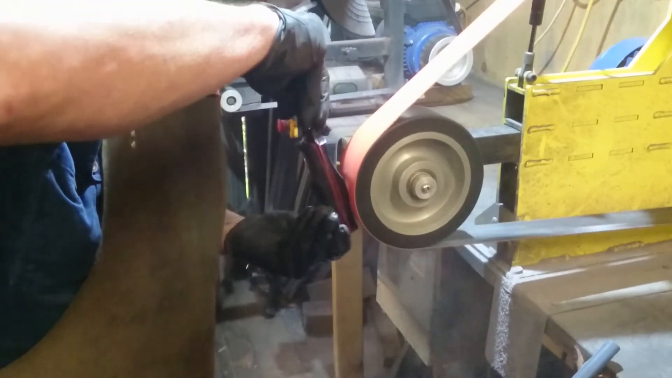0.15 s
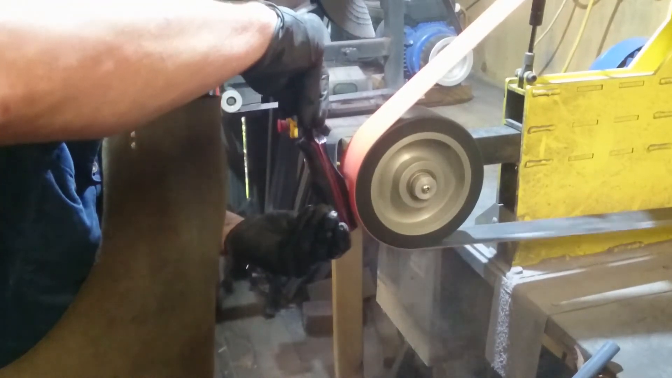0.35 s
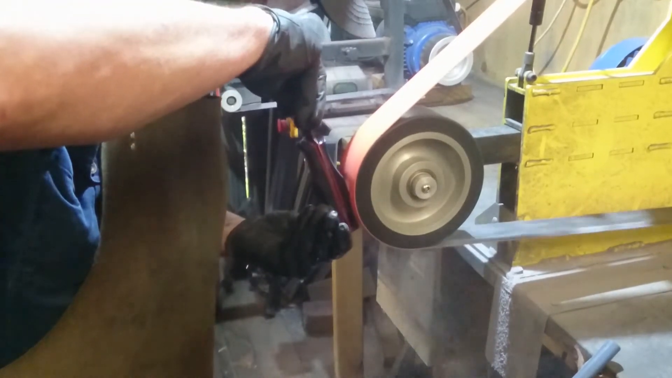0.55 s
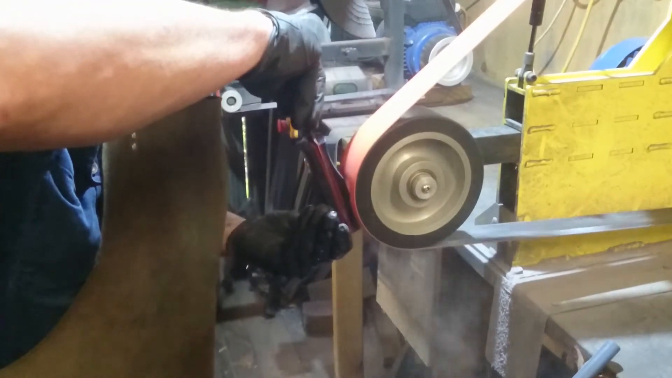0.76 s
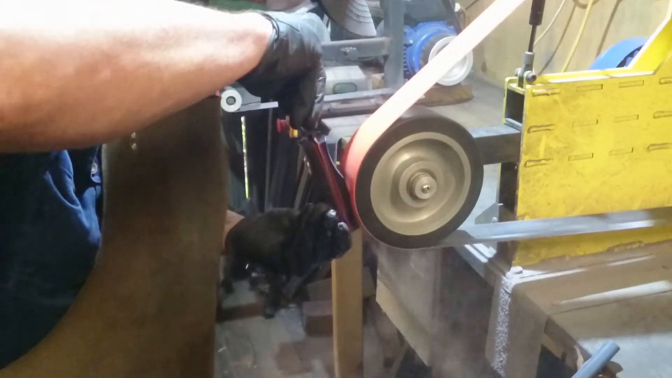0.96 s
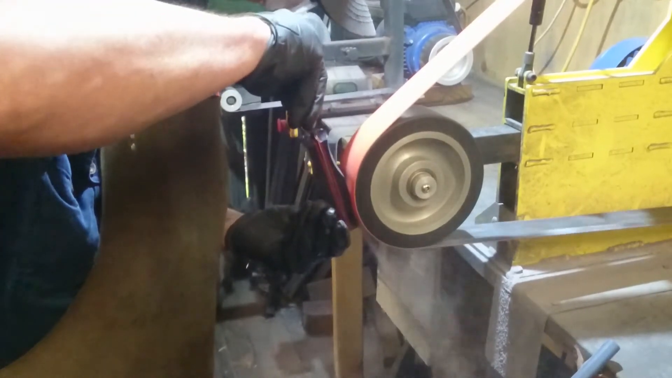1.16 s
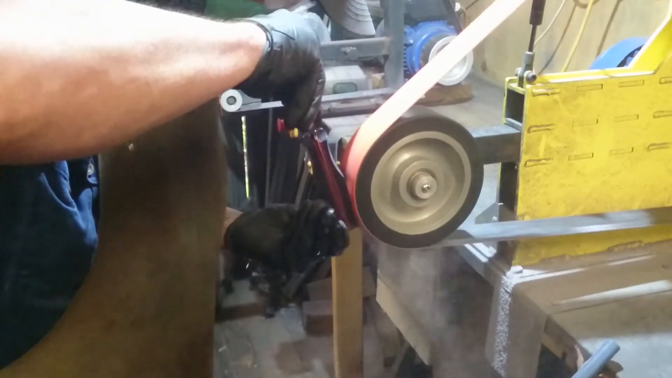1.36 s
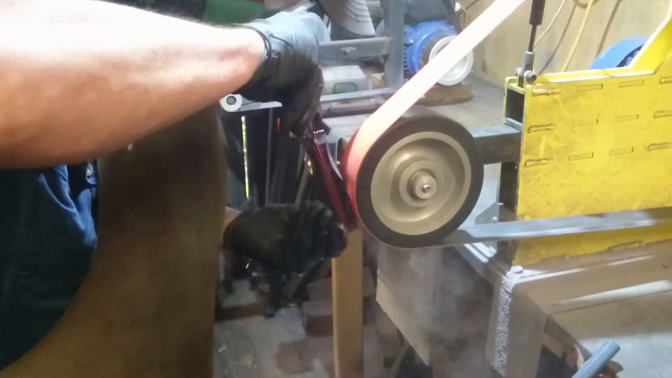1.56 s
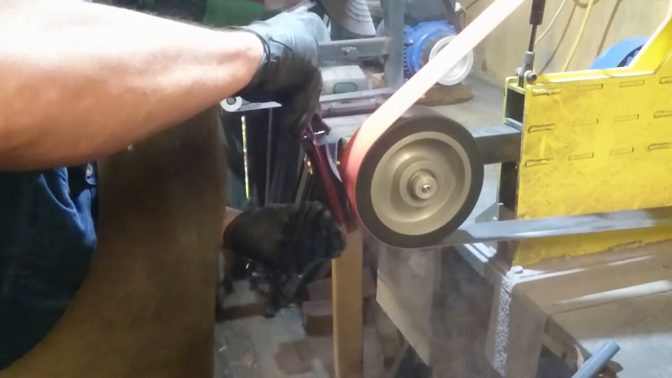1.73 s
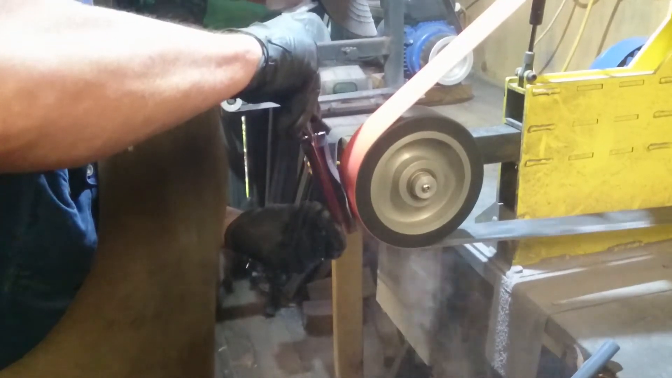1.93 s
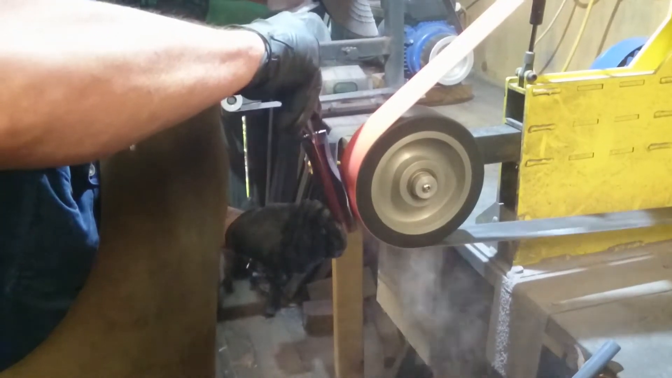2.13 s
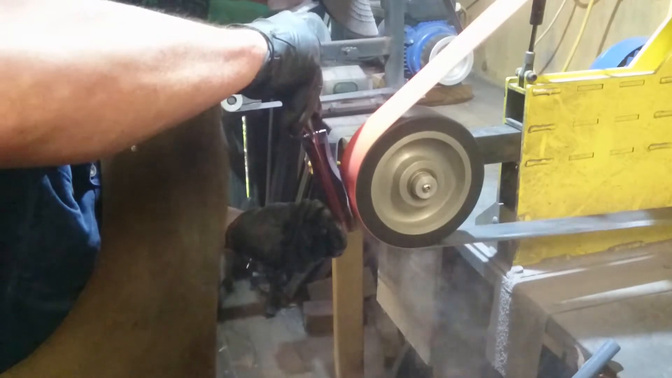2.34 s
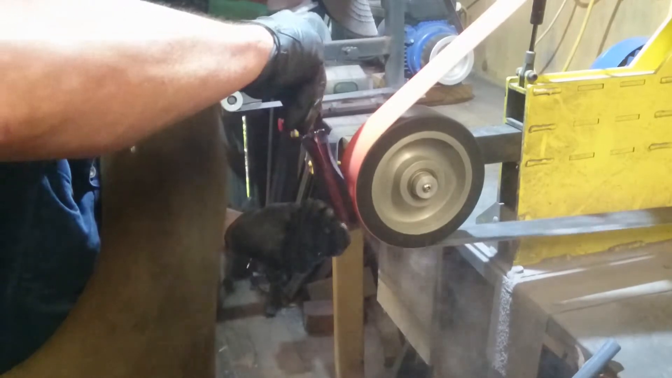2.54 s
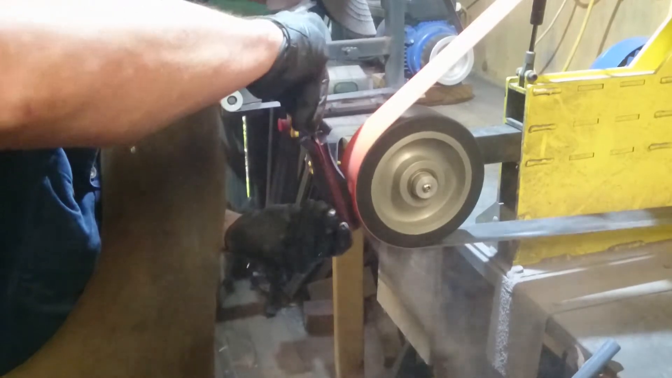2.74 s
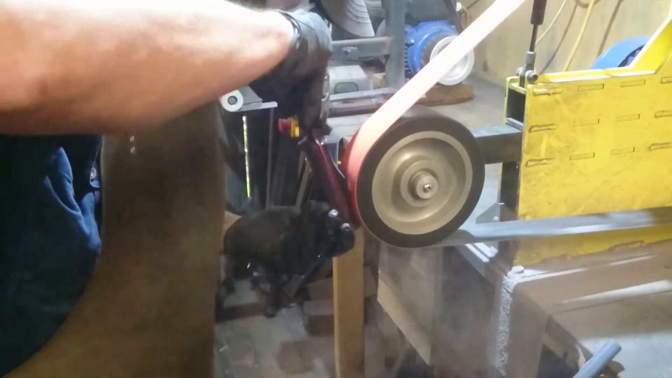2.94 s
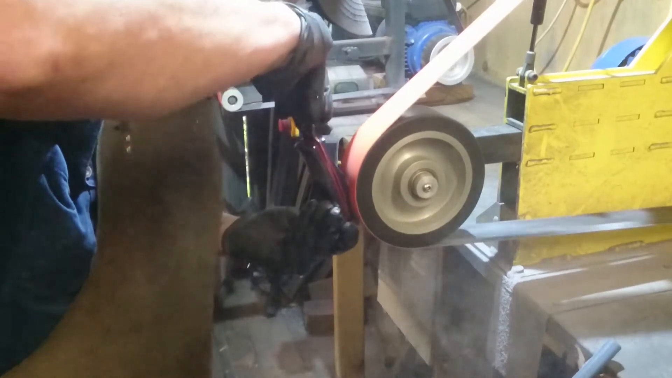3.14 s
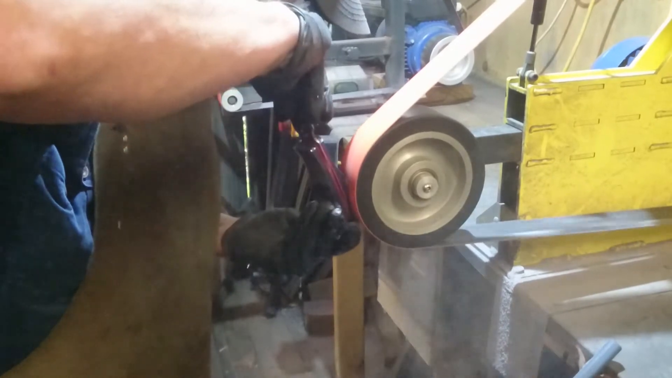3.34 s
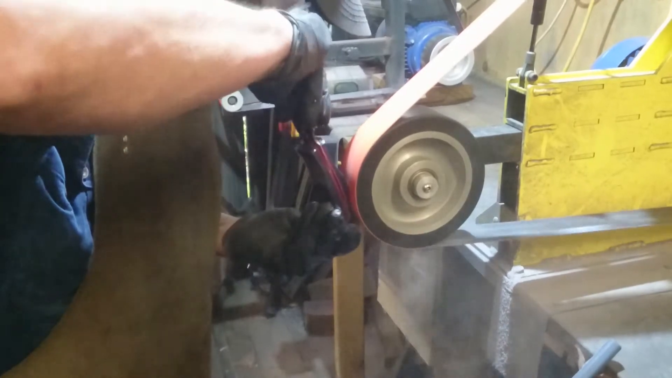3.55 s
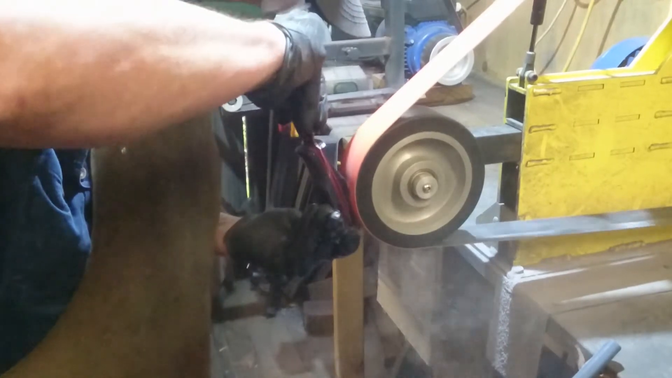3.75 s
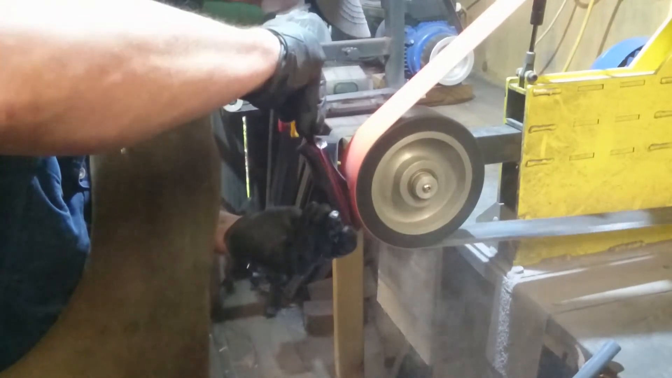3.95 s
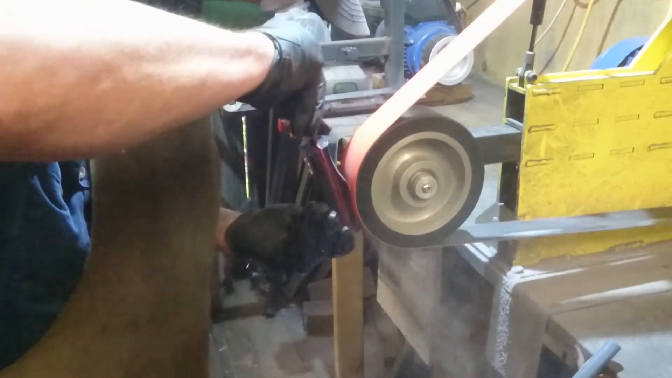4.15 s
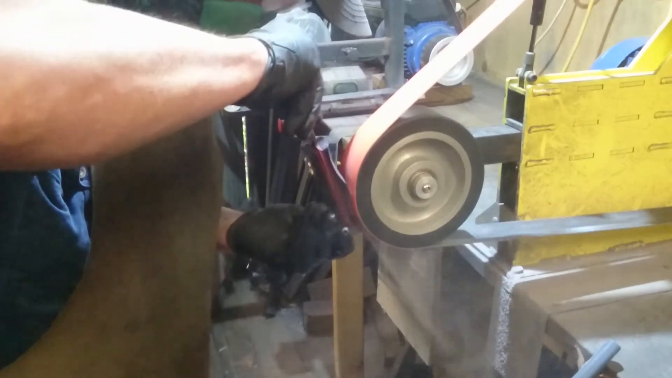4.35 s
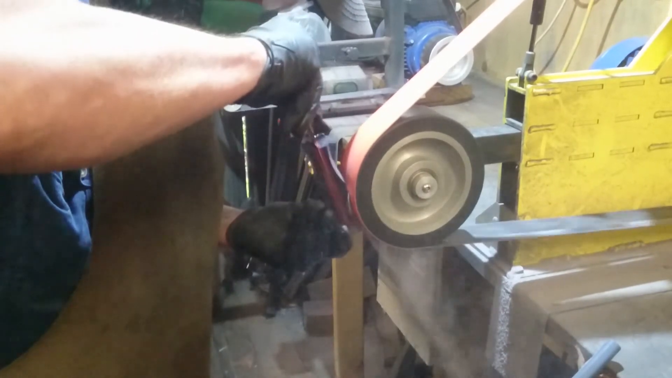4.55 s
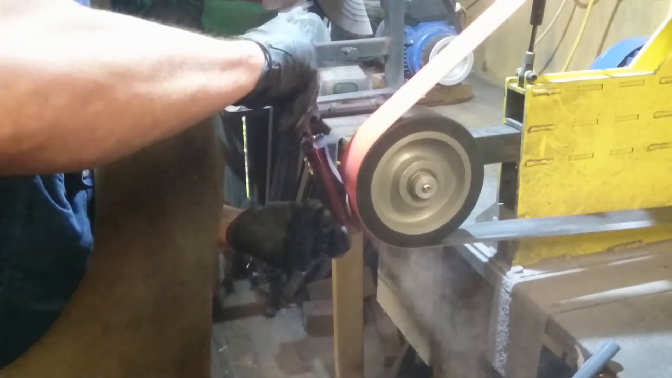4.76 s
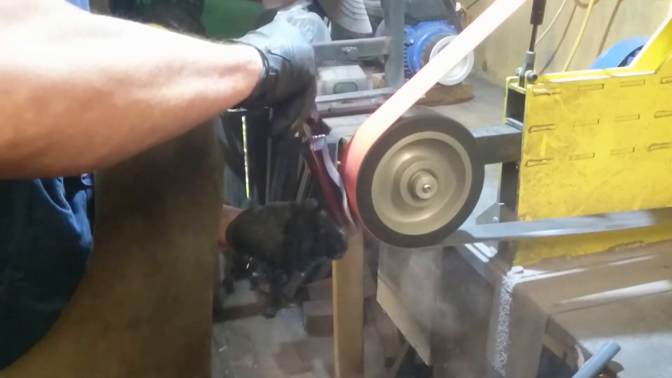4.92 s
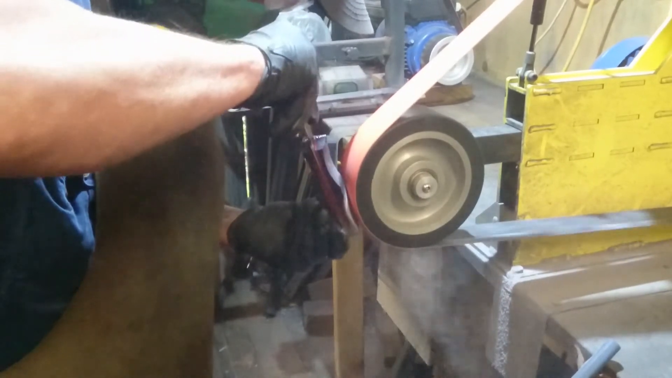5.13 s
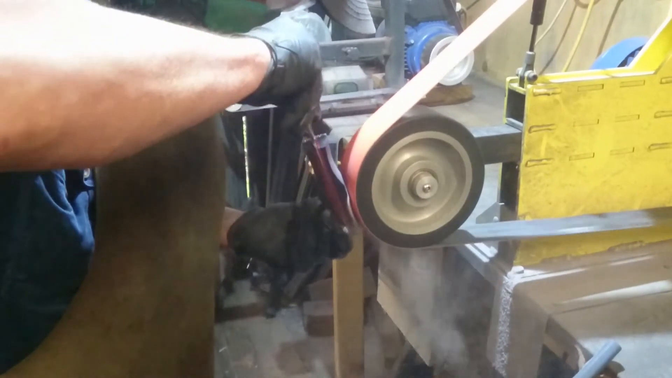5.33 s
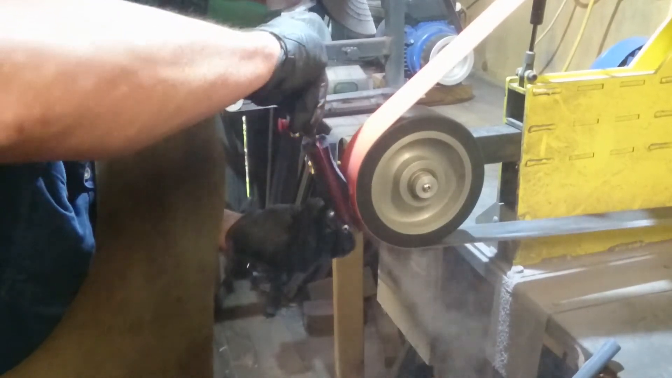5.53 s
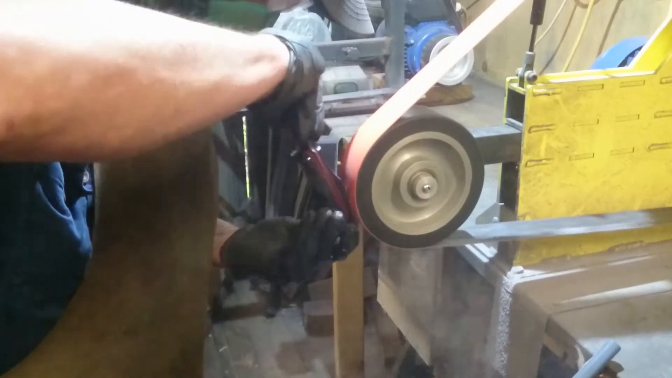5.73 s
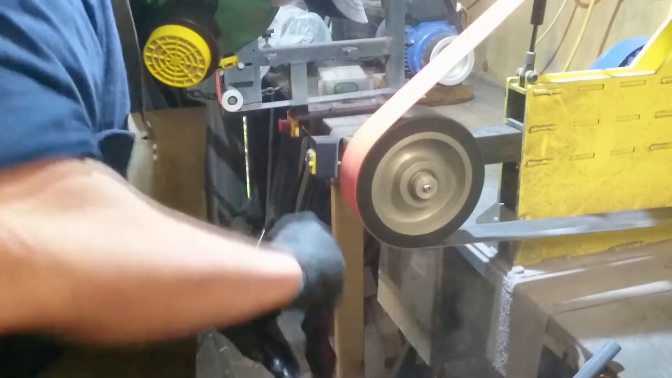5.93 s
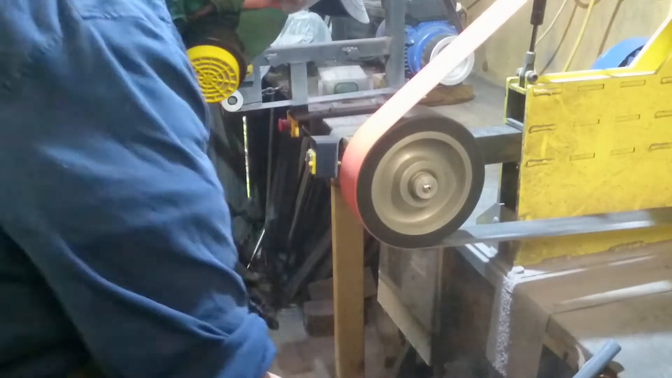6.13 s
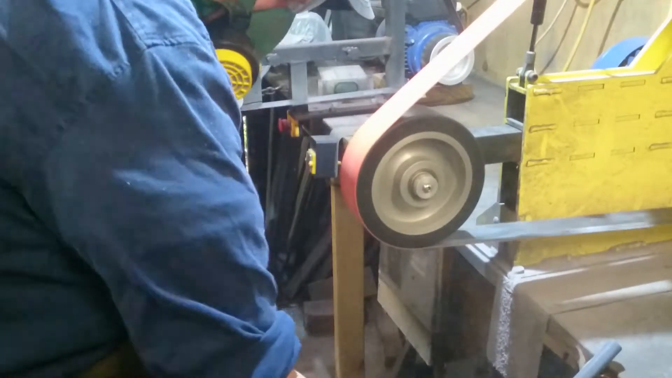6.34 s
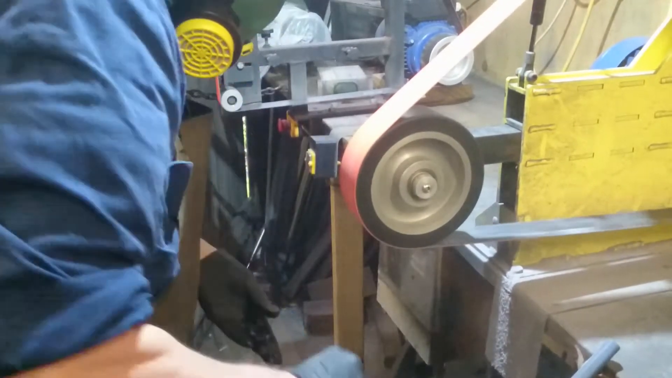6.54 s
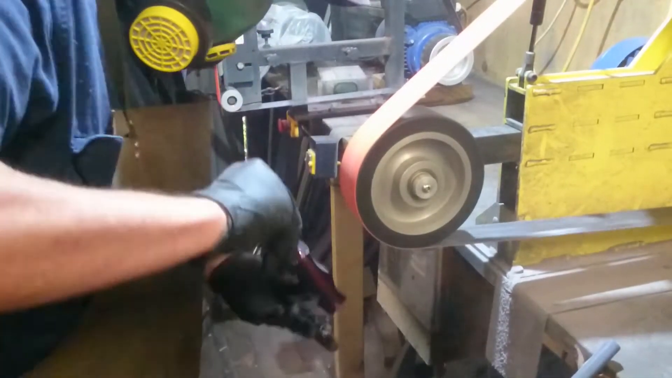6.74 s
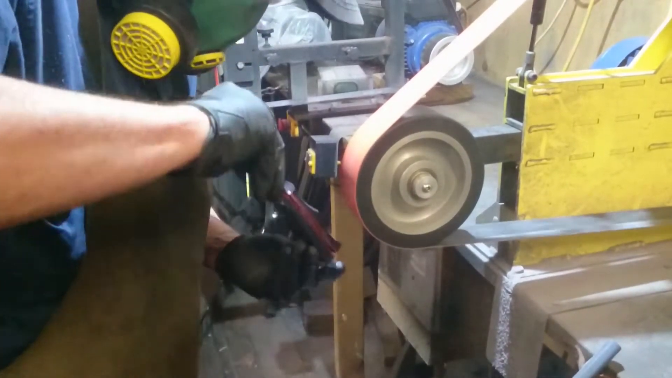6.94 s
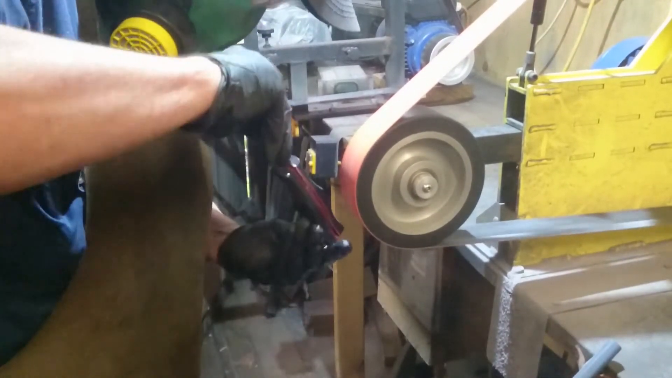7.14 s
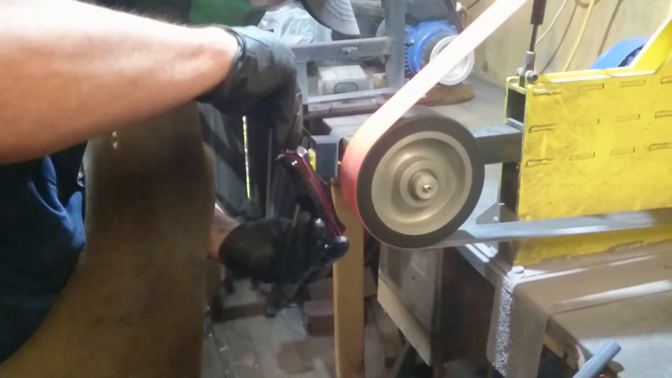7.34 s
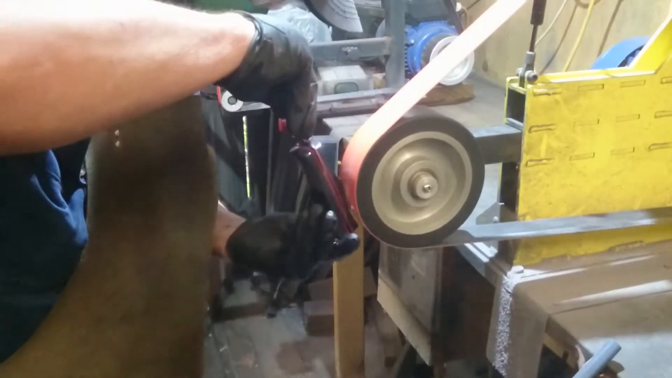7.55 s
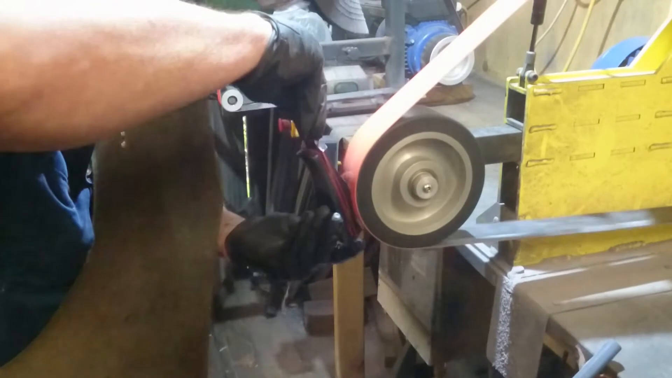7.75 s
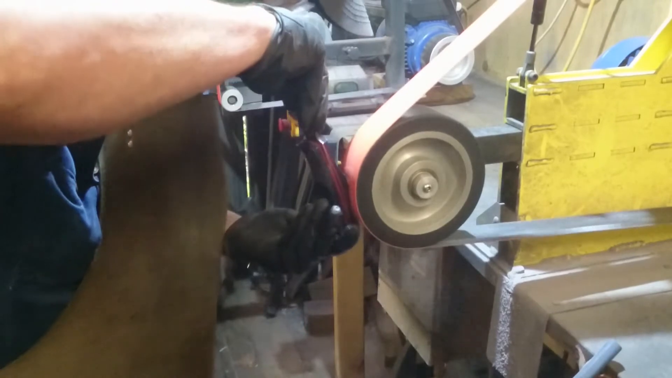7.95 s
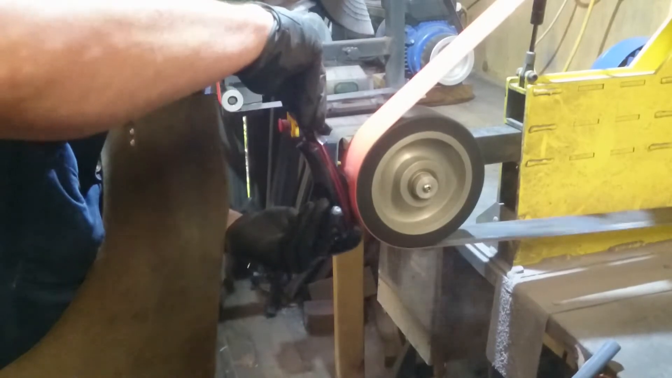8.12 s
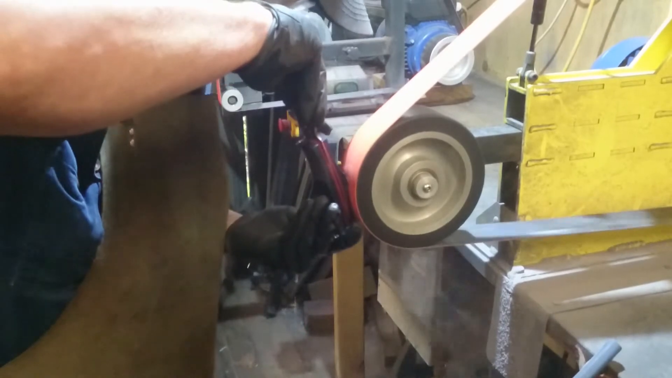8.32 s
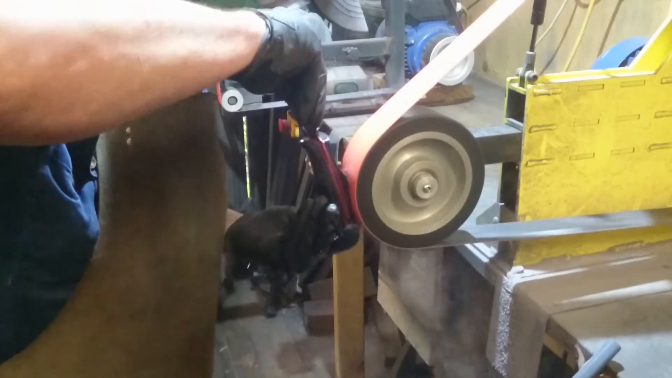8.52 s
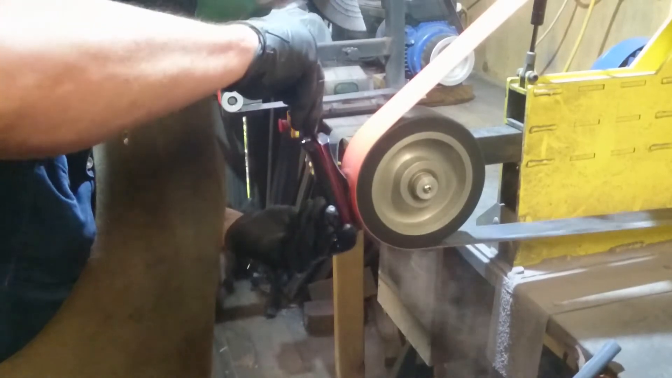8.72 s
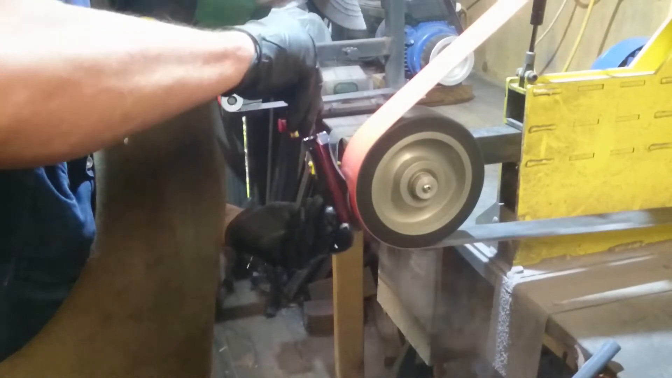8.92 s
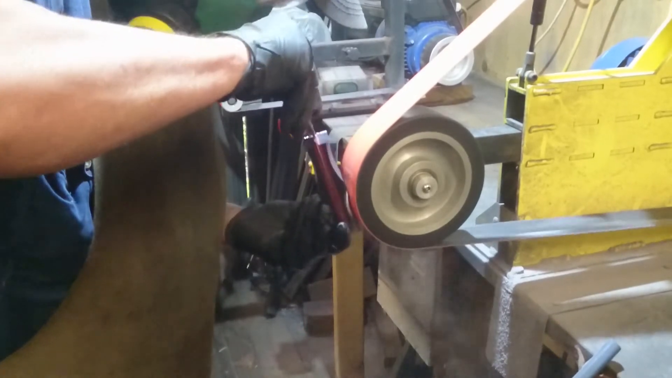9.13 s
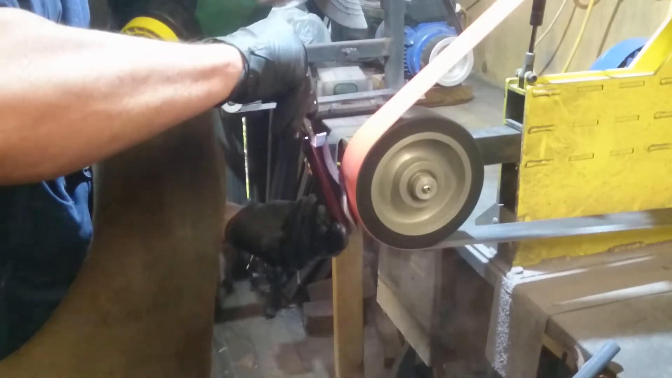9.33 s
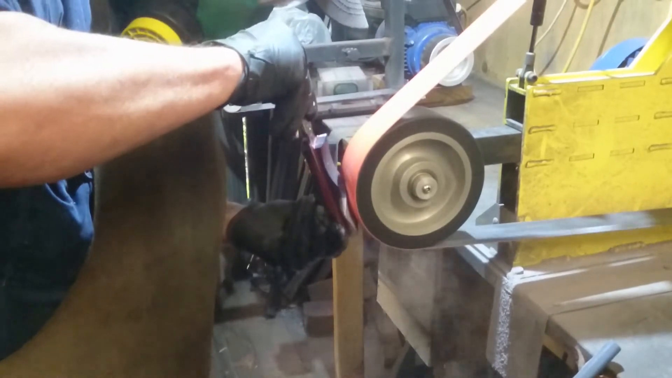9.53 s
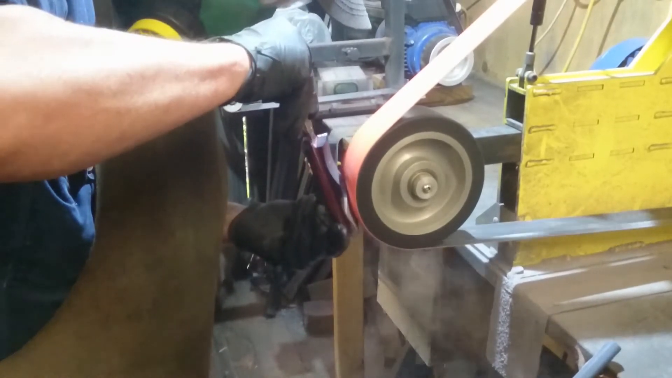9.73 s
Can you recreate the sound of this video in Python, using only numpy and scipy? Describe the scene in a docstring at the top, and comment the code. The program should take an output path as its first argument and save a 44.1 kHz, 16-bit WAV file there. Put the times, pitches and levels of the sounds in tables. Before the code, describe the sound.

A belt grinder whines steadily while a blade hisses harshly on its abrasive belt, lifts off for two seconds, then is pressed on again.

```python
"""A workshop belt grinder whines, hums and swishes throughout, its belt slapping softly as splice and kink come round.
A blade is already grinding on its contact wheel: grit hisses through the blade's resonances and throbs with
every lap, the frame rumbles, and early on the bouncing blade adds low drones. At 5.8 s the blade lifts off for
about two seconds, then is pressed on again, lightly at first. Hiss and swish are shaped noise, the motor is
wavering sines; two microphone ports hear it, nearly in opposite phase in the bass."""
import sys
import numpy as np
from scipy import signal
from scipy.fft import rfft, irfft
from scipy.io import wavfile
from scipy.ndimage import uniform_filter1d

SR = 44100
rng = np.random.default_rng(int(sys.argv[2]) if len(sys.argv) > 2 else 0)


def to_wav(sig):
    """Store sig (one row per channel, or 1-D mono) as 16-bit WAV at the path in sys.argv[1].

    Samples outside -1..1 are clipped; the rate is SR.
    """
    pcm = np.clip(np.atleast_2d(sig), -1, 1) * 32767
    pcm = np.round(pcm).astype(np.int16)
    wavfile.write(sys.argv[1], SR, pcm.T)  # frames by channels


N = 431295
TIME = np.arange(N) / SR


def gain_of(db):
    """Decibels to amplitude."""
    return 10 ** (np.asarray(db) / 20)


def evened(x):
    """Scales to an rms of one."""
    return x / np.sqrt(np.mean(abs(x) ** 2) + 1e-20)


def curve(rows, t):
    """Every column of a time table, read at the times t."""
    seconds, *columns = np.transpose(rows)
    return np.array([np.interp(t, seconds, column) for column in columns])


def read(rows, hz):
    """Every column of a frequency table, read on a log axis: columns x bins x 1."""
    row_hz, *columns = np.transpose(rows)
    at, knots = np.log(hz + 1), np.log(abs(row_hz) + 1)
    return np.array([np.interp(at, knots, column) for column in columns])[:, :, None]


def hump(hz, centre, half_width):
    """Bell-shaped weight of one resonance, down to 1/e at its half width: bins x 1, or x times."""
    return np.exp(-((hz[:, None] - centre) / half_width) ** 2)


def above(hz, edge_hz, order):
    """Share of each frequency that lies above a soft edge: bins x 1."""
    return (hz ** order / (hz ** order + edge_hz ** order))[:, None]


def swell(t, centre, half_length):
    """Bell-shaped rise and fall in time, down to 1/e at its half length."""
    return np.exp(-((t - centre) / half_length) ** 2)


def wander(rate_hz):
    """Smooth random motion of rms one, up to about the given rate."""
    size = 2 ** 19
    hz = np.fft.rfftfreq(size, 1 / SR)
    smooth = np.exp(-(hz / rate_hz) ** 2)
    return evened(irfft(rfft(rng.standard_normal(size)) * smooth)[:N])


def waver(rate_hz):
    """A slowly turning random phasor of rms one, for tones that are not quite steady."""
    knots = np.arange(0, TIME[-1] + 1, 1 / 200)
    smooth = np.exp(-(np.fft.fftfreq(len(knots), knots[1]) / rate_hz) ** 2)
    noise = rng.standard_normal(len(knots)) + 1j * rng.standard_normal(len(knots))
    path = np.fft.ifft(smooth * noise)
    return evened(np.interp(TIME, knots, path))


def port_noise(ports, size):
    """Short-time spectra of white noise (0 dB per Hz) as the two ports share it."""
    white = rng.standard_normal((2, N)) * np.sqrt(SR / 2)
    hz, t, (left, other) = signal.stft(white, SR, nperseg=size)
    coherence, lead = read(ports, hz)
    right = (coherence * left + np.sqrt(1 - coherence ** 2) * other) * np.exp(-1j * lead)
    return hz, t, np.array([left, right])


def to_sound(z):
    """Short-time spectra back to a waveform."""
    return signal.istft(z)[1][:, :N]


def room_ripple(hz, depth_db, count=3):
    """Reflections from bench and walls put fixed fine peaks and dips in each port's spectrum."""
    return depth_db * evened(uniform_filter1d(rng.standard_normal((2, len(hz), 1)), count, axis=1))


def belt_texture(laps, count):
    """Random unevenness fixed along the belt, so that it returns on every lap."""
    return np.interp(laps, np.arange(count) / count, evened(rng.standard_normal(count)), period=1)


# Passes of the blade over the belt. Each row: touches at in seconds, lifts off at in seconds,
# slowing of the belt in laps a second, lift of the sizzle in dB.
PASSES = [(-.2, 5.845, 0.0786, 0.4), (7.72, 10, 0.049, 2)]
# the blade takes this long to seat on the belt and to come away
SEAT_S, LEAVE_S = .07, .06


def passes(t):
    """Contact (0-1), and the belt's slowing and sizzle dB of whichever pass is under way."""
    touch, lift, *settings = np.transpose(PASSES)[:, :, None]
    contact = np.clip(np.minimum((t - touch) / SEAT_S, (lift - t) / LEAVE_S), 0, 1)
    return [(contact * value).sum(0) for value in [1, *settings]]


# speed of the free belt, and how slowly the motor follows a change of load
IDLE_LAPS_PER_S, INERTIA_S = 4.741, .3


def belt_laps():
    """Laps the belt has run: it slows under the blade and recovers when free."""
    _, slowing, _ = passes(TIME)
    keep = np.exp(-1 / (INERTIA_S * SR))
    lagged_slowing = signal.lfilter([1 - keep], [1, -keep], slowing)
    return np.cumsum(IDLE_LAPS_PER_S - lagged_slowing) / SR


# Resonances of the frame, at full share. Each row: centre in Hz, half width in Hz, boost in dB.
FRAME = [(215, 36, 8), (358, 18, 3), (470, 30, 3), (552, 32, 9.5), (645, 30, 7), (712, 26, 6), (780, 14, 4),
         (852, 30, 3.5), (1505, 70, 4)]


def frame_colour(hz):
    """Decibels that the frame's resonances add: bins x 1."""
    return sum(db * hump(hz, centre, half_width) for centre, half_width, db in FRAME)


# Swish of belt and motor, before frame and room. Each row: frequency in Hz, left and right in dB per Hz.
SWISH = [(25.0, -76.5, -76), (55.0, -72, -71), (122, -74.5, -72.5), (160.0, -80, -73), (437, -75.5, -78),
         (550, -76.5, -71), (1200, -74.5, -73), (2070, -70, -68.5), (2800, -66.5, -71), (2890, -77, -71),
         (4150, -64, -64.5), (4720, -61.5, -58.5), (5630, -61, -58), (6780, -71, -70.5), (8000, -79, -70),
         (9600, -87, -75.5), (11500.0, -89, -75.5), (14700.0, -75, -72), (15600.0, -77.9, -78.8)]
# How the ports share the swish. Each row: frequency in Hz, coherence from 0 to 1, left's lead in radians.
SWISH_PORTS = [(50, 0.73, -3.0), (250, 0.86, -3.2), (550, 0.82, -3.9), (1400, 0.33, -4.3),
               (3000, 0.16, -1.9), (4500, 0.51, -1.7), (6000, 0.2, -4.2), (8000, 0.28, -6.3),
               (14000, 0.32, -9.1)]
# Splice and kink slapping the wheel. Each row: place as a fraction of a lap, half length in laps,
# jump of the treble in dB.
SLAPS = [(.008, .012, 6.3), (.72, .045, 1.3)]
# the slaps are brightest between these edges; share of them left above the upper one
SLAP_BAND_HZ, SLAP_TOP_SHARE = (3200, 8500), .3


def running_belt(laps, uneven_db=0.9, frame_share=0.58, ripple_db=1.4):
    """The belt swishes over the wheels; its treble jumps as the splice and kink come round."""
    hz, _, z = port_noise(SWISH_PORTS, size=2048)
    z = z * gain_of(read(SWISH, hz) + frame_share * frame_colour(hz) + room_ripple(hz, ripple_db))
    low_edge, high_edge = SLAP_BAND_HZ
    top_cut = 1 - (1 - SLAP_TOP_SHARE) * above(hz, high_edge, order=10)
    treble = above(hz, low_edge, order=3) * top_cut
    slap_db = 0
    for place, half_length, db in SLAPS:
        # shortest way round the belt, in laps
        distance = (laps - place + .5) % 1 - .5
        slap_db = slap_db + db * swell(distance, 0, half_length)
    treble_db = slap_db + uneven_db * belt_texture(laps, count=60)
    return to_sound(z * (1 - treble)) + to_sound(z * treble) * gain_of(treble_db)


def tones(rows, unsteady, rate_hz, trim_db=0):
    """Sine lines whose strength and phase waver, each reaching the two ports with its own phase."""
    out = np.zeros((2, N))
    for hz, left_db, right_db, lead in rows:
        carrier = np.exp(2j * np.pi * (hz * TIME + rng.random()))
        tone = carrier * (np.sqrt(1 - unsteady ** 2) + unsteady * waver(rate_hz))
        left = gain_of(left_db) * tone.real
        right = gain_of(right_db) * (tone * np.exp(-1j * lead)).real
        out += [left, right]
    # the table levels are rms, hence the root of two
    return np.sqrt(2) * gain_of(trim_db) * out


# Hum of motor, wheel and frame. Each row: pitch in Hz, left and right rms level in dB before the trim,
# left's lead in radians.
HUM = [(50, -68, -65, -3), (66, -65, -62, -3), (118, -61, -57, -3), (200, -67, -62, -3),
       (236, -60, -57, -3), (555, -55, -51, 2.3), (655, -61, -57, 2.3), (860, -66, -61, 2.3),
       (1086, -66, -60, 2.5), (1488, -63, -57, 2.9), (1714, -66, -57, 1.1)]


def motor_hum():
    """Motor, wheel and frame hum on low lines that waver strongly."""
    return tones(HUM, unsteady=0.84, rate_hz=5.8, trim_db=-3.5)


# Inverter whine in the motor windings. Each row: pitch in Hz, left and right rms level in dB,
# left's lead in radians.
WHINE = [(5899.5, -40.5, -36.5, .4), (5933.9, -49.6, -39, .7), (6034.3, -53.8, -41.6, 1.8),
         (6101.7, -32.5, -31.5, -1.5), (6235, -55.7, -48, 1.1), (6639.3, -53.2, -48.5, 1.4),
         (12538, -76, -55, -3.1)]


def inverter_whine():
    """The inverter makes the motor windings whine on high, nearly steady lines."""
    return tones(WHINE, unsteady=.17, rate_hz=2)


def whine_fuzz(peak_db_per_hz=-64.5, centre_hz=6120, half_width_hz=135):
    """A narrow, fuzzy whistle from the motor lies under the clean lines of its whine."""
    hz, _, z = port_noise(SWISH_PORTS, size=2048)
    return gain_of(peak_db_per_hz) * to_sound(z * hump(hz, centre_hz, half_width_hz))


# How hard the blade is pressed on. Each row: time in seconds, hiss level in dB.
PRESS = [(.15, -5.5), (.7, 0.5), (1.25, -0.5), (1.65, 0.8), (2.1, 0.5), (2.85, .5), (3.3, -1.5),
         (3.68, -1.5), (4.13, 0.7), (4.55, -.6), (4.8, 0), (5.12, -2), (5.4, 0), (5.66, 1.7), (5.8, -1.5),
         (7.78, -5.5), (8.2, -3), (8.62, 0), (9.25, 0.2), (9.3, 0.2), (9.7, 0)]
# How flat the blade lies; a broad contact rings low. Each row: time in seconds, lowest resonance in dB, its
# centre in Hz (it shifts as the contact slides), middle resonance in dB.
FLAT = [(0.0, 4, 3630, -2.5), (0.8, -2, 3520, -2), (1.35, 2, 3880, .5), (1.62, 11, 3740, 0),
        (2.0, 6, 3950, -0.5), (2.45, 3.5, 3850, 0.5), (2.75, -5, 3590, -7), (3.07, 2.5, 3490, -2),
        (3.35, -6, 3240, -3.5), (3.9, 3.5, 3840, -2), (4.35, -6, 3760, -2.5), (4.85, 6.5, 3460, 2.5),
        (5.35, 6.5, 3950, 3), (5.65, -6, 3950, -6), (7.8, -2, 3630, -2), (8.6, -6, 3710, -4),
        (8.95, -23, 3830, -5), (9.25, -10, 3800, -5), (9.55, 4, 3810, -2.5)]
# Upper resonance, sliding as the contact moves along the edge. Each row: time in seconds,
# centre in Hz, boost in dB.
UPPER = [(.15, 6950, 2.5), (.9, 8200, 3), (2.1, 7300, -1.5), (2.6, 6850, 0.5), (2.95, 7350, 2.5),
         (3.4, 7600, 0), (3.95, 6760, 3), (4.45, 7650, 1.5), (5.15, 7100, -2.5), (5.6, 6800, 0),
         (7.8, 7300, -2), (8.4, 7120, 0.5), (8.7, 8600, -0.5), (9.4, 7300, -3.5)]
# The sizzle spreads into the valley below it and draws back as the blade tilts. Each row:
# time in seconds, centre in Hz, boost in dB before each port's share.
SPREAD = [(.5, 9800, -.5), (1.0, 9800, -0.5), (1.35, 10000, -1), (2.25, 10500, -3.5), (2.8, 10200, 3),
          (3.5, 9200, -5.5), (4.35, 11200, 2), (4.6, 9400, -2), (5.1, 10200, -2.5), (5.5, 9800, -2),
          (7.9, 9500, 1.5), (8.6, 10500, 2), (9.15, 12300, 3), (9.35, 11000, -3), (9.55, 10500, 3)]
# the middle resonance stays put; half widths of the lowest, middle and upper one
MIDDLE_HZ, RING_HALF_WIDTHS_HZ = 5220, (450, 790, 2100)
# half width of the spreading band, and how strongly the left and right port hear it move
SPREAD_HALF_WIDTH_HZ, SPREAD_SHARES = 1600, (1.4, 0.52)
# the sizzle sharpens with pressure and follows the lowest resonance slightly (dB per dB)
SIZZLE_PER_PRESS, SIZZLE_PER_FLAT = 0.17, 0.03


def blade_colour(hz, t):
    """Decibels that the blade's resonances and sizzle add as the contact slides, tilts and is pressed."""
    flat_db, lowest_hz, middle_db = curve(FLAT, t)
    upper_hz, upper_db = curve(UPPER, t)
    spread_hz, spread_db = curve(SPREAD, t)
    *_, sizzle_db = passes(t)
    rings = (lowest_hz, flat_db), (MIDDLE_HZ, middle_db), (upper_hz, upper_db)
    blade_db = sum(hump(hz, centre, half_width) * db
                   for (centre, db), half_width in zip(rings, RING_HALF_WIDTHS_HZ))
    # a broad contact that rings the lowest resonance also fills the range below it
    blade_db += hump(hz, 1950, 980) * flat_db
    sizzle_db = sizzle_db + SIZZLE_PER_FLAT * flat_db + SIZZLE_PER_PRESS * curve(PRESS, t)
    blade_db += hump(hz, 13400, 2100) * sizzle_db
    shares = np.array(SPREAD_SHARES)[:, None, None]
    valley_db = shares * hump(hz, spread_hz, SPREAD_HALF_WIDTH_HZ) * spread_db
    return blade_db + valley_db


# Bass under the blade, on top of the rumble. Each row: time in seconds, boost in dB.
BASS = [(.3, 2), (1.2, -2), (1.7, 0.5), (2.7, 0.5), (4.1, .5), (5.1, -0.5), (8.1, 1), (9.2, -5), (9.55, 0)]
# The blade jolts the frame. Each row: strongest at in seconds, half length in seconds, boom in dB.
JOLTS = [(.11, 0.076, 7), (.65, .11, 7), (3.18, 0.077, 3), (5.788, 0.043, 7)]


def loaded_frame_colour(hz, t, boom_hz=552, boom_half_width_hz=55):
    """Decibels the frame adds under the blade: its resonances, the boom of each jolt, and moving bass."""
    jolt_db = sum(db * swell(t, at, half_length) for at, half_length, db in JOLTS)
    boom_db = hump(hz, boom_hz, boom_half_width_hz) * jolt_db
    bass_db = (1 - above(hz, 250, order=4)) * curve(BASS, t)
    return frame_colour(hz) + boom_db + bass_db


# reflection off the hands: delay at the left and right port, its rms drift as a share, depth of its bands
ECHO_S, ECHO_DRIFT, ECHO_DB = (.00062, .00085), .06, 1.4


def hand_echo(hz, t):
    """A near reflection off the moving hands lays slowly sliding bands (dB) on the treble."""
    drift = 1 + ECHO_DRIFT * np.interp(t, TIME, wander(rate_hz=0.98))
    delay_s = np.array(ECHO_S)[:, None, None] * drift
    return ECHO_DB * above(hz, 5700, order=6) * np.cos(2 * np.pi * hz[:, None] * delay_s)


# Hiss of grit cutting steel, before blade, frame and room. Each row: frequency in Hz,
# left and right in dB per Hz.
HISS = [(25.0, -75, -82), (60.0, -80.2, -72.5), (160.0, -75.5, -75), (211.0, -80, -74), (600.0, -76, -73.5),
        (950, -80, -79), (2000, -77.5, -79.5), (2800, -75, -74), (3310, -68, -70), (4120, -61, -58.5),
        (5200, -52, -53), (6450, -59.5, -52), (7380, -56.5, -56.5), (9300, -72.5, -59),
        (11050, -70.5, -60.5), (13380, -61, -55.5), (14600, -50.5, -54.5), (15600.0, -52.5, -54)]
# How the ports share the hiss. Each row: frequency in Hz, coherence from 0 to 1, left's lead in radians.
HISS_PORTS = [(60, 0.84, -2.9), (550, 0.73, -3.9), (1100, 0.3, -3.7), (2200, 0.15, -2.5),
              (3200, 0.45, -3.0), (3850, 0.6, -3.0), (5000, 0.19, -1.4), (6400, 0.27, -2.9),
              (7700, 0.43, -3.2), (10000, 0.17, -1.1), (12000, 0.19, 0.2), (14000, 0.24, 1.5),
              (15700, 0.18, 0.0)]


def grinding_noise(ripple_db=1.1, patchy_db=1.4):
    """Short-time spectra of grit on steel, coloured by the frame and by the way the blade is held."""
    hz, t, z = port_noise(HISS_PORTS, size=2048)
    # slow random drift of the hiss's colour
    patches = uniform_filter1d(rng.standard_normal(z.shape), size=16, axis=1)
    patches = evened(uniform_filter1d(patches, size=16, axis=2))
    source_db = read(HISS, hz) + blade_colour(hz, t) + loaded_frame_colour(hz, t)
    around_db = room_ripple(hz, ripple_db) + hand_echo(hz, t)
    return hz, z * gain_of(source_db + around_db + patchy_db * patches)


def grains(flutter_db, grit_db):
    """Gain from uneven contact and from single grains tearing out chips, whose size is bounded."""
    chips = 2 * np.tanh(wander(rate_hz=3600) / 2)
    return gain_of(flutter_db * wander(rate_hz=22) + grit_db * chips)


def hand_tremor(depth_db=0.5, rate_hz=26):
    """Gain from the small unsteadiness of the hands."""
    return gain_of(depth_db * wander(rate_hz))


# Rumble of the frame under the blade. Each row: time in seconds, level in dB.
RUMBLE = [(0.0, 1), (0.3, 1.5), (1.0, 1), (1.65, -0.5), (2.0, 1), (2.7, -2), (3.2, 2.5), (3.5, 0),
          (3.95, 2.2), (4.4, -1.5), (5.1, 2), (5.55, -4.5), (5.75, 1), (7.8, -2), (8.3, 0), (9.15, -3.5),
          (9.55, 0)]
# How strongly the belt bites along its length, from the splice on. Each row: place as a fraction of a lap,
# level in dB (in full on the fizz, in part on the ring).
BITE = [(.01, 0.9), (.05, 1.1), (.235, 0.5), (.295, 4), (.36, 0.8), (.47, 0.8), (.555, 1.5), (.66, 0),
        (.76, -0.3), (.845, 1.1)]


def grinding(laps, uneven_db=0.5, fizz_db=.5, ring_follows=.6):
    """The frame rumbles, the blade rings, and the cutting point fizzes with every grain and lap."""
    hz, z = grinding_noise()
    over_frame, over_blade = above(hz, 1800, order=4), above(hz, 11500, order=10)
    contact, *_ = passes(TIME)
    press_db = curve(PRESS, TIME)
    bite_db = np.interp(laps, *np.transpose(BITE), period=1) + uneven_db * belt_texture(laps, count=70)
    rumble = to_sound(z * (1 - over_frame)) * gain_of(curve(RUMBLE, TIME))
    # only a share of the belt's unevenness survives in the ringing blade
    ring = to_sound(z * (over_frame - over_blade)) * gain_of(press_db + ring_follows * bite_db)
    fizz = to_sound(z * over_blade) * gain_of(press_db + bite_db + fizz_db)
    hiss = ring * grains(flutter_db=.45, grit_db=1.0) + fizz * grains(flutter_db=.4, grit_db=1.5)
    return contact * (rumble + hiss * hand_tremor())


# Bouts of the blade bouncing on the wheel. Each row: strongest at in seconds, half length in seconds,
# bounces a second, level in dB at the right port.
CHATTER = [(.5, 0.9, 57, -45), (1.856, 0.28, 114, -36), (2.15, .3, 52, -41)]


def chatter():
    """The hand-held blade bounces on the rubber wheel: narrow drones that swell and fade."""
    drone = 0
    for at, half_length, hz, db in CHATTER:
        bounce = np.exp(2j * np.pi * hz * TIME) * waver(rate_hz=22)
        drone = drone + gain_of(db) * swell(TIME, at, half_length) * bounce
    # the left port hears it weaker and nearly inverted
    ports = np.array([[.7 * np.exp(2.7j)], [1]])
    return np.sqrt(2) * (drone * ports).real


def scene():
    """Belt, hum, whine, grinding and chatter together."""
    laps = belt_laps()
    machine = running_belt(laps) + motor_hum() + inverter_whine() + whine_fuzz()
    blade = grinding(laps) + chatter()
    return machine + blade


def record(dry, edge_hz=15800):
    """A steep linear-phase low-pass ends the treble at the edge."""
    low_pass = signal.firwin(767, edge_hz, window=("kaiser", 9), fs=SR)
    return signal.oaconvolve(dry, low_pass[None], "same")


dry = scene()
out = record(dry)
to_wav(out)
```